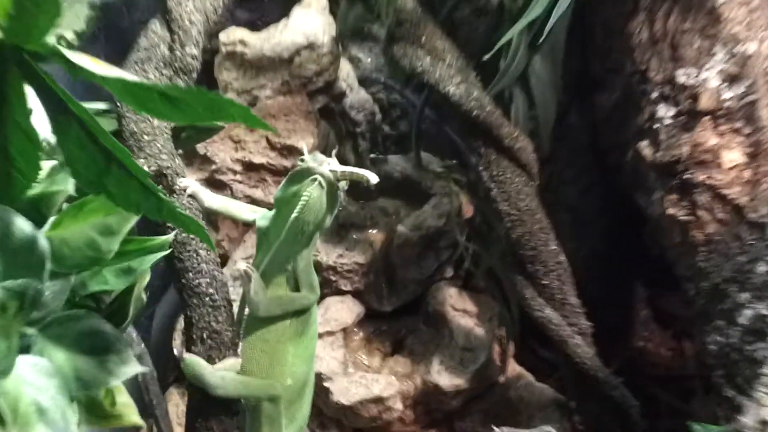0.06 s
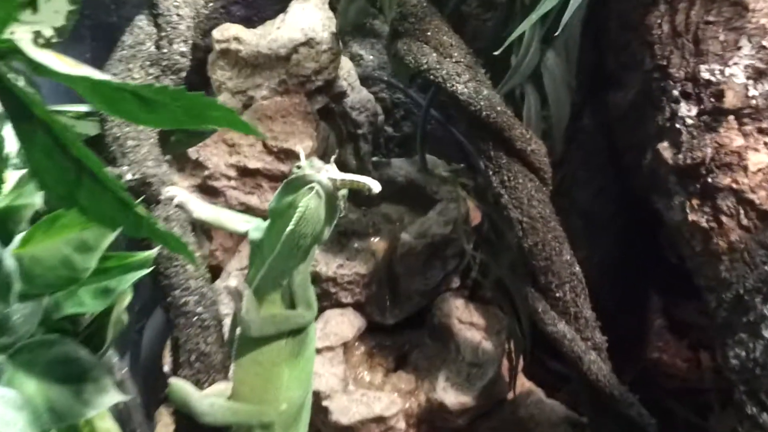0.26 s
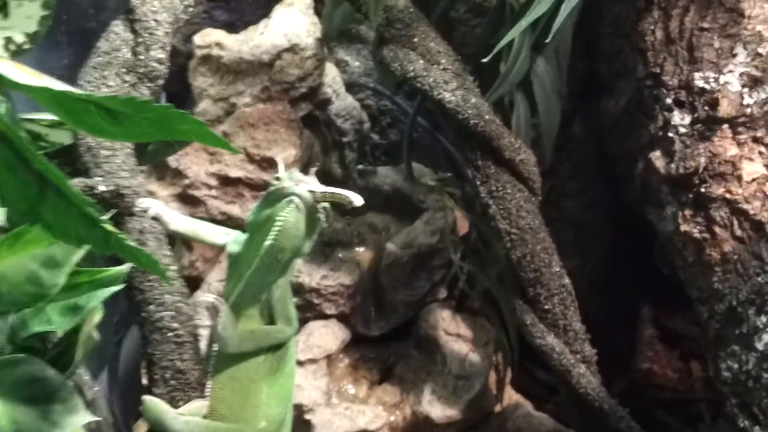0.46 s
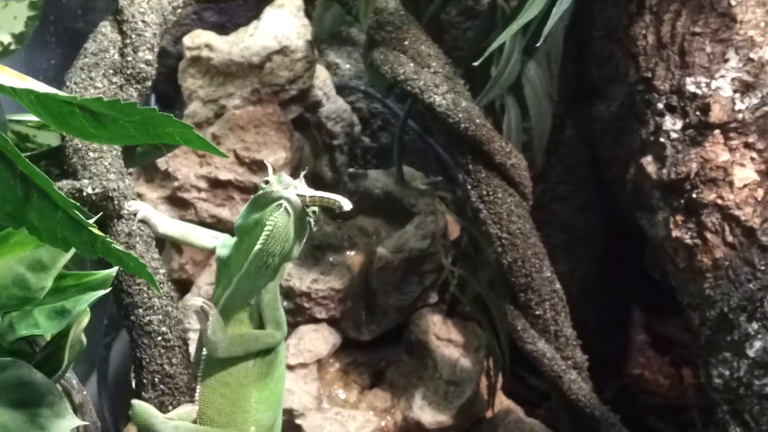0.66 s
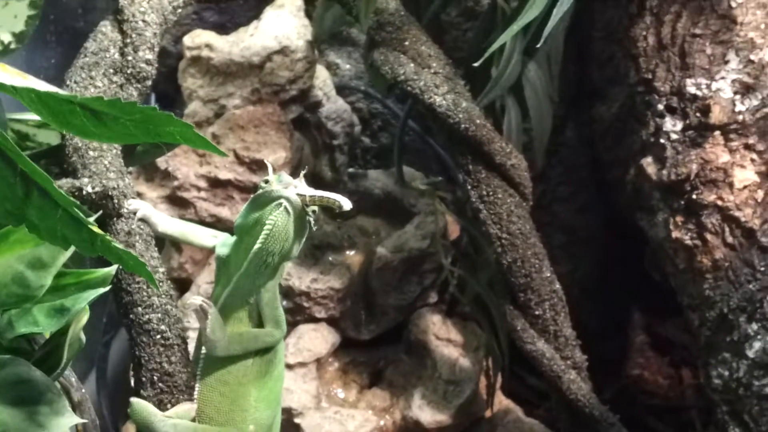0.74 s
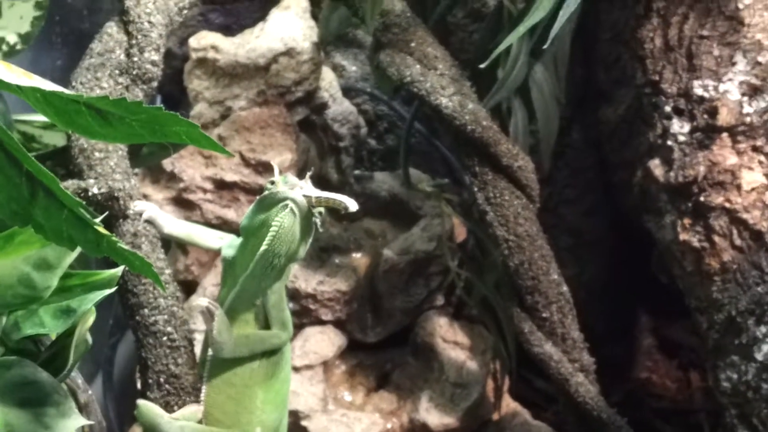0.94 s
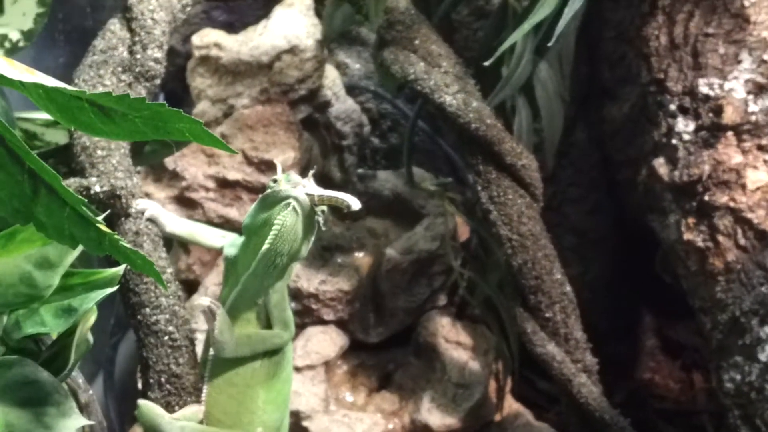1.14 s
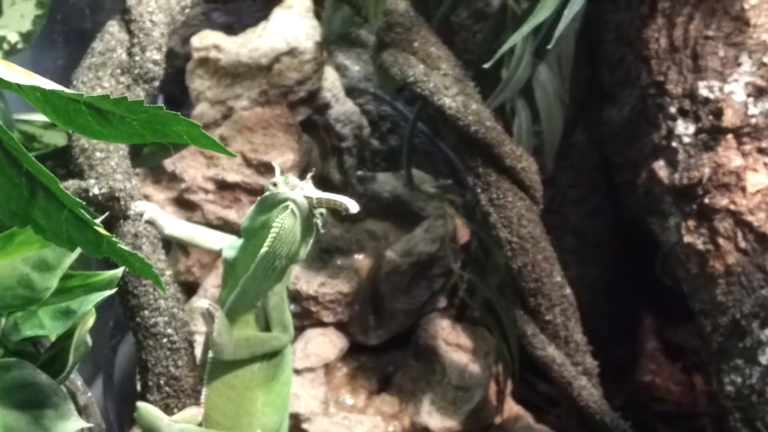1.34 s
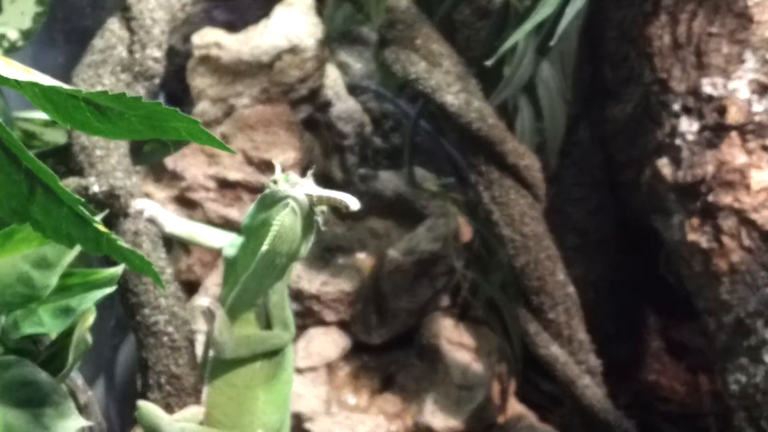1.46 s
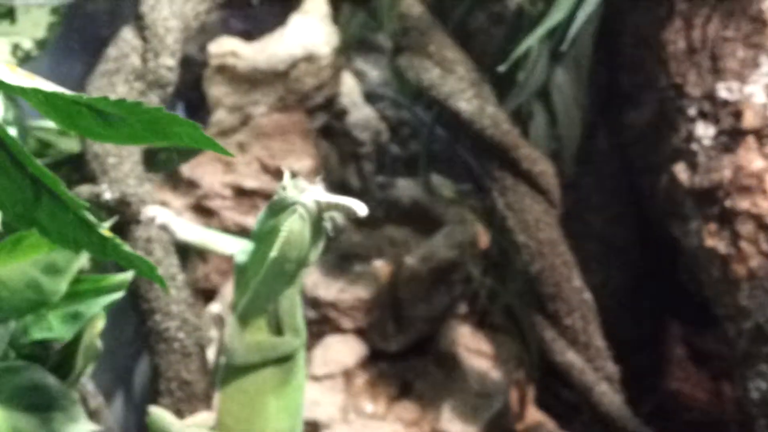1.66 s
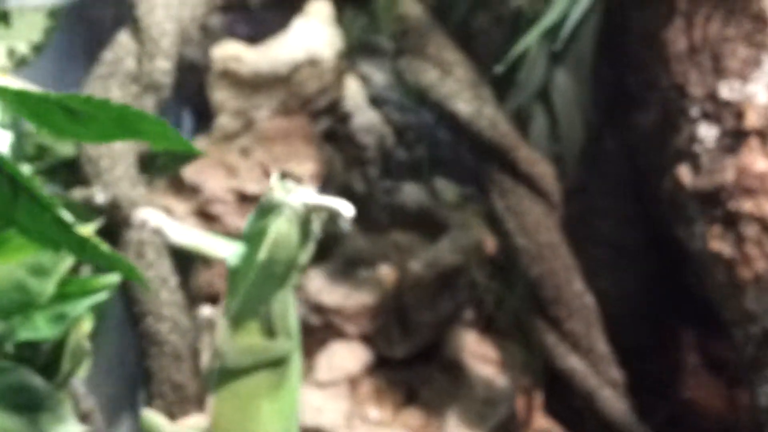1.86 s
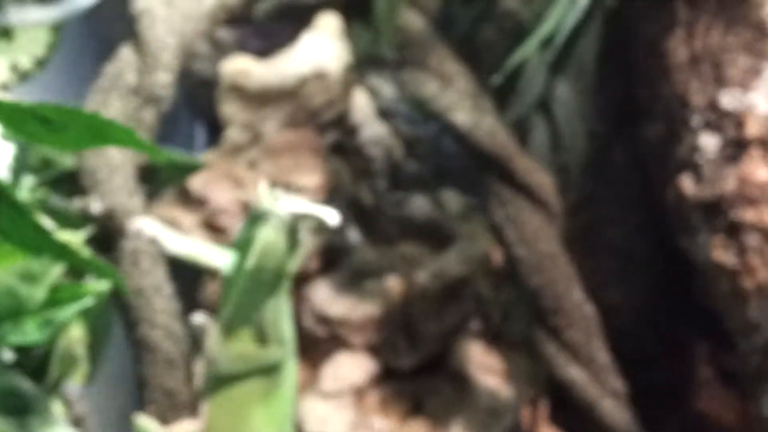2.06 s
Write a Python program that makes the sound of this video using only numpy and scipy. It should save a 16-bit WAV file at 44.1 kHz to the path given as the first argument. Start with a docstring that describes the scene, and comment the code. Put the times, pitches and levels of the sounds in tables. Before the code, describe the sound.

A chameleon chews an insect close to the microphone in a small terrarium. From 0.2 to 0.8 seconds come quick, sharp wet clicks with a few hollow, crackly crunches, loudest at the start. A single sharp click follows at 1.1 seconds, a click with a small drop-like plink near 1.7, and another click at 1.8. Faint hiss and low electrical hum continue throughout.

```python
"""A chameleon chews an insect in a small terrarium, close to the microphone.
Sharp wet clicks run throughout, each a narrow treble ring with a broad snap. Early on, a few knocks
ring a hollow body and crackle. Short tones plink like drops: bubbles and a faint ring of the terrarium.
The near walls give each a dense, short flutter; faint hiss and mains hum lie underneath."""
import sys
import numpy as np
from scipy import signal
from scipy.fft import rfft, irfft
from scipy.io import wavfile

SR = 44100
rng = np.random.default_rng(int(sys.argv[2]) if len(sys.argv) > 2 else 0)


def wav_record(signal):
    """Record a signal, one row per channel, as 16-bit PCM in the file named by sys.argv[1]."""
    frames = np.transpose(np.atleast_2d(signal))
    bounded = np.clip(frames, -1, 1)
    # unit amplitude maps onto the largest positive 16-bit level
    quanta = np.round(bounded * 32767).astype(np.int16)
    wavfile.write(sys.argv[1], SR, quanta)


N = 92610
AGE_S = np.arange(int(0.4 * SR)) / SR  # time axis of one event
TAIL_T60_S = 0.21  # terrarium reverberation


def from_db(db):
    """Decibels to gain."""
    return 10 ** (np.asarray(db) / 20)


def fade(t60_s):
    """Exponential decay over one event."""
    return 1000.0 ** (-AGE_S / t60_s)


def at_level(x, db, window_s=0.025):
    """Scale an event so that its energy, spread over window_s, has this level."""
    return x * from_db(db) / np.sqrt(np.sum(x ** 2) / (window_s * SR) + 1e-20)


def add(out, t_s, x):
    """Mix an event into the track at t_s."""
    start = int(t_s * SR)
    out[start:start + len(x)] += x[:N - start]


def butter(x, hz, kind, order=2):
    """Butterworth filter."""
    sos = signal.butter(order, np.clip(hz, 10, 0.48 * SR), kind, fs=SR, output="sos")
    return signal.sosfilt(sos, x + 1e-18)


def coloured(x, spectrum):
    """Minimum-phase filter through (f/Hz, gain/dB) points."""
    size = 2 * len(x)
    hz, db = np.transpose(spectrum)
    grid_hz = np.maximum(np.arange(len(x) + 1) * SR / size, 1)
    gain = from_db(np.interp(np.log(grid_hz), np.log(hz), db))
    cepstrum = irfft(np.log(gain))
    cepstrum[1:len(x)] *= 2  # fold onto the causal half
    cepstrum[len(x) + 1:] = 0
    return irfft(rfft(x, size) * np.exp(rfft(cepstrum)))[:len(x)]


def background(hiss_db=-56.5, hum_hz=98.6, hum_db=-64):
    """Steady room hiss and mains hum."""
    # hiss spectrum: f/Hz, gain/dB
    hiss_spectrum = [(25, -12.5), (60, -10), (110, -11.5), (420, -12.5), (960, -16.5), (1500, -19),
                     (3500, -22.5), (6300, -23), (7500, -21.5), (10000, -24.5), (16000, -26.5)]
    hiss = coloured(rng.standard_normal(N + SR), hiss_spectrum)[SR:]
    hum = np.sqrt(2) * np.sin(2 * np.pi * (hum_hz * np.arange(N) / SR + rng.random()))
    return from_db(hiss_db) * hiss / hiss.std() + from_db(hum_db) * hum


def flutter(t60_s, echoes_per_s=6000, direct_db=-18, tail_db=-25):
    """Terrarium impulse response: direct sound, quick wall echoes, faint tail."""
    count = len(AGE_S)
    arrivals = rng.random(count) < echoes_per_s / SR
    echoes = arrivals * rng.choice([-1, 1], count) * rng.uniform(0.54, 1, count)
    tail = from_db(tail_db) * rng.standard_normal(count) * fade(TAIL_T60_S)
    response = echoes / echoes.std() * fade(t60_s) + tail
    response[0] += from_db(direct_db) * np.sqrt(np.sum(response ** 2))
    return response


def shrill(x):
    """Fixed narrow treble resonances give every click the same shrill ring."""
    # resonances: f/Hz, width/Hz
    resonances = [(5070, 32), (6760, 180), (7500, 210)]
    peaks = [signal.iirpeak(hz, hz / width_hz, fs=SR) for hz, width_hz in resonances]
    return x + sum(signal.lfilter(b, a, x) for b, a in peaks)


def clicks():
    """Each click rings briefly at its own pitch, with a broad snap, and flutters between the walls."""
    # clicks: t/s, ring level/dB, f/Hz, width/Hz, snap re ring/dB, flutter t60/s
    events = [(0.182, -59.5, 10300, 1500, 0.5, 0.044), (.207, -47.5, 8700, 3000, -5, 0.047),
              (0.225, -39, 4530, 506, -23, 0.0084), (0.2263, -40.5, 7150, 1010, -21, 0.0064),
              (0.2305, -54, 14300, 2000, -10, 0.032), (0.246, -55, 8050, 800, -17, 0.065),
              (0.2605, -52, 6070, 3200, -11, 0.011), (0.3222, -62, 6900, 2520, -2, 0.031),
              (.365, -36.5, 6030, 3200, -11, 0.038), (0.4598, -45, 5700, 3240, -10.5, 0.094),
              (.485, -54, 7750, 2400, -12, 0.041), (.586, -53, 6200, 3950, -6, 0.028),
              (.591, -48.5, 6100, 3420, -9, 0.09), (0.626, -43.5, 8860, 2470, -7.5, 0.012),
              (0.6435, -49.5, 7600, 2910, -12, 0.13), (.6458, -48.5, 13500, 3200, 3, 0.028),
              (0.7429, -40, 7350, 1210, -9, 0.035), (1.028, -62, 9700, 2530, -2.5, 0.041),
              (1.095, -33, 7850, 2680, -31, 0.035), (1.096, -50.5, 5050, 1200, -20, 0.058),
              (1.1263, -57, 5000, 6000, -14, .035), (1.452, -60, 6700, 3000, -8, 0.045),
              (1.630, -64.5, 7950, 2970, -8, 0.032), (1.6707, -47, 7230, 1870, -5.5, 0.048),
              (1.821, -37.5, 6950, 1490, -8, 0.051), (1.8224, -41, 5910, 496, -14, 0.053),
              (1.958, -62.5, 8400, 1600, -3, 0.039), (2.06, -63.5, 5540, 1200, 2, 0.051)]
    # snap spectrum: f/Hz, gain/dB
    snap_spectrum = [(300, -101), (2000, -9.5), (4500, -4), (8000, 9.5), (11000, 5.5), (15500, -8)]
    out = np.zeros(N)
    for t_s, db, hz, width_hz, snap_db, t60_s in events:
        ring = butter(flutter(t60_s), [hz - width_hz / 2, hz + width_hz / 2], "band", order=3)
        snap = coloured(flutter(t60_s), snap_spectrum)
        add(out, t_s, at_level(shrill(ring), db))
        add(out, t_s, at_level(shrill(snap), db + snap_db))
    return out


def crackle(top_hz, grain_hz=450, grain_db=2):
    """A flutter clumped into tiny cracks by a fast random gain."""
    # crackle spectrum: f/Hz, gain/dB
    spectrum = [(150, -5.5), (300, -3.5), (1000, -2), (1800, 0), (3000, -6), (4500, -5.5), (6000, -9),
                (7600, -9), (10000, -17.5), (15000, -31)]
    grain = butter(rng.standard_normal(len(AGE_S)), grain_hz, "low")
    cracks = flutter(t60_s=0.091) * from_db(grain_db * grain / grain.std())
    return butter(coloured(cracks, spectrum), top_hz, "low")


def knocks(thud_hz=132.5, thud_attack_s=0.037):
    """Each contact rings and damps one band of a hollow body, with clatter, wash, crackle and thud."""
    # knocks: t/s, base level/dB, low edge/Hz, high edge/Hz, crackle/dB, thud/dB, damping t60/s
    events = [(.2014, -36, 467, 650, -39.5, -45, 0.064), (0.2264, -28.5, 648, 1190, -34, -72, 0.33),
              (0.262, -45, 514, 890, -46, -89, 0.31), (0.4223, -49.5, 463, 720, -56, -63, 1),
              (0.4621, -41, 453, 910, -49.5, -47, 0.75), (0.554, -55.5, 506, 785, -56.5, -100, 0.34),
              (.5903, -50.5, 306, 476, -49, -60, 0.11), (.5975, -42, 513, 708, -77, -70, 0.09)]
    # hollow body modes: f/Hz, relative level/dB, t60 before damping/s
    modes = [(364, 0, 0.99), (506.5, 6, 0.17), (614, 4, .13), (739, 7, 0.13), (975, 2, 0.12),
             (1037, -0.5, 0.22), (1109, -10, 0.2), (1228, 3, 0.13), (1345, 3, 0.16), (1548, 4, 0.16),
             (1594, 5, 0.086), (1740, 4, 0.25)]
    thud = np.sin(2 * np.pi * thud_hz * AGE_S) * (1 - np.exp(-AGE_S / thud_attack_s)) * fade(t60_s=0.17)
    out = np.zeros(N)
    for t_s, db, low_hz, high_hz, crackle_db, thud_db, damping_t60_s in events:
        ring = sum(from_db(mode_db + rng.normal(0, 1)) * fade(t60_s) * np.sin(2 * np.pi * hz * AGE_S)
                   for hz, mode_db, t60_s in modes)
        ring *= fade(damping_t60_s)
        wash = rng.standard_normal(len(AGE_S)) * fade(t60_s=0.45)
        clatter = flutter(t60_s=0.1)
        for part, offset_db in ((ring, -1), (clatter, -7.5), (wash, -14)):
            add(out, t_s, at_level(butter(part, [low_hz, high_hz], "band"), db + offset_db))
        add(out, t_s, at_level(crackle(top_hz=14 * high_hz), crackle_db))
        add(out, t_s, at_level(thud, thud_db))
    return out


def plinks(attack_s=0.0063, rise_per_s=0.52, burst_width_ratio=0.088):
    """Short, slightly rising tones, each in a noise burst: bubbles and a faint ring of the terrarium."""
    # plinks: t/s, level/dB, start f/Hz, t60/s, burst re tone/dB
    events = [(.381, -61.5, 2136, 0.093, 7), (0.6496, -55.5, 2896, 0.035, 2),
              (1.1262, -51.5, 1387, 0.038, -4.5), (1.4505, -53, 2038, 0.045, -5),
              (1.453, -64.5, 4110, 0.026, -3), (1.6695, -44, 1379, 0.083, -11),
              (1.672, -63, 2050, 0.11, -17), (1.6755, -57.5, 2893, .035, -1),
              (1.6755, -64.5, 4100, 0.047, -8)]
    edge_ratio = 1 + burst_width_ratio / 2
    out = np.zeros(N)
    for t_s, db, hz, t60_s, burst_db in events:
        phase = 2 * np.pi * hz * (AGE_S + rise_per_s * AGE_S ** 2 / 2)
        tone = np.sin(phase) * (1 - np.exp(-AGE_S / attack_s)) * fade(t60_s)
        tail = rng.standard_normal(len(AGE_S)) * fade(TAIL_T60_S)
        reverb = signal.fftconvolve(tone, tail)[:len(AGE_S)]
        burst = butter(flutter(t60_s=0.034), [hz / edge_ratio, hz * edge_ratio], "band", order=1)
        plink = at_level(tone, db=0) + at_level(reverb, db=-9) + at_level(burst, burst_db)
        add(out, t_s, at_level(plink, db))
    return out


def scene():
    """Chewing over hiss and hum, the same in both channels."""
    return np.tile(background() + clicks() + knocks() + plinks(), (2, 1))


def record(dry):
    """Steep elliptic low-pass."""
    cutoff_hz = 16000
    return signal.sosfilt(signal.ellip(12, 0.1, 80, cutoff_hz, fs=SR, output="sos"), dry)


dry = scene()
out = record(dry)
wav_record(out)
```